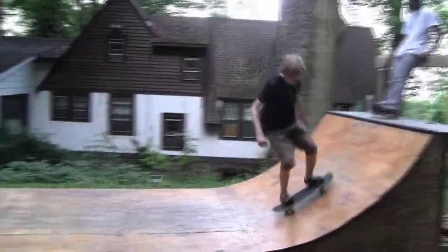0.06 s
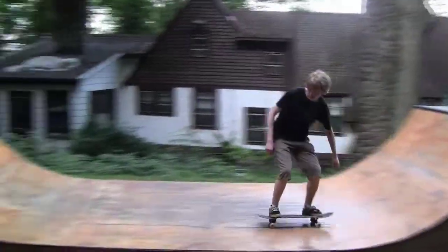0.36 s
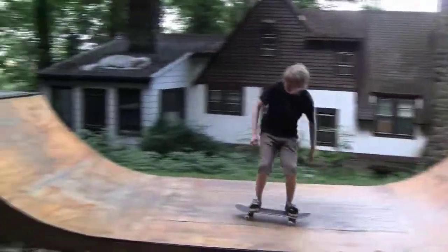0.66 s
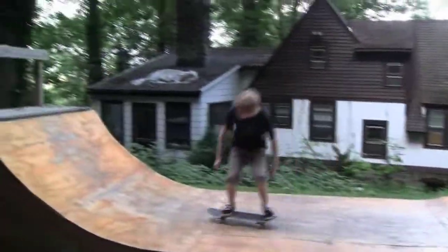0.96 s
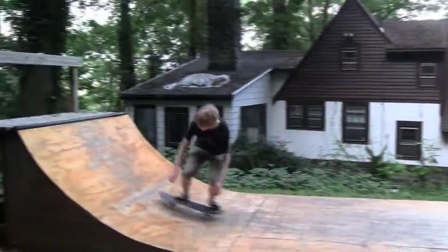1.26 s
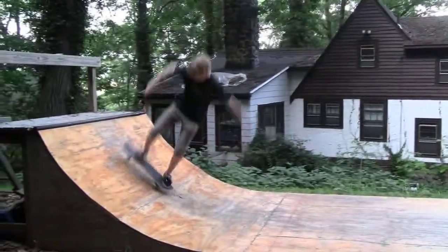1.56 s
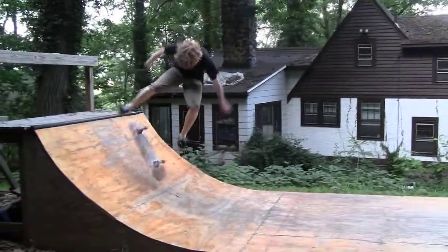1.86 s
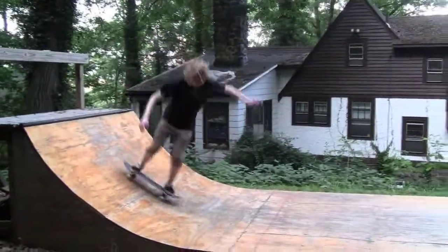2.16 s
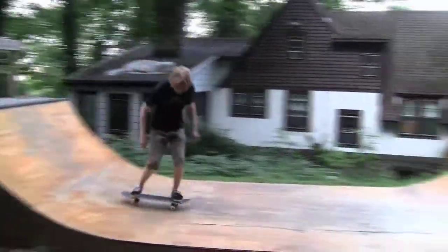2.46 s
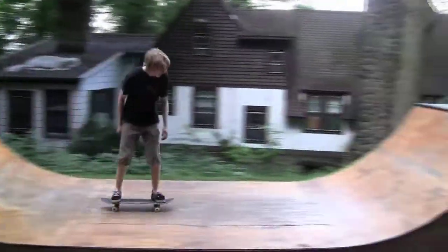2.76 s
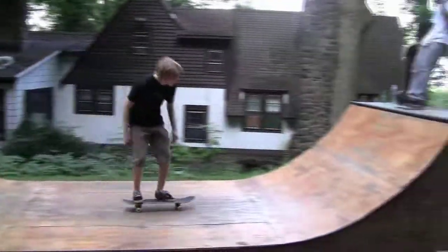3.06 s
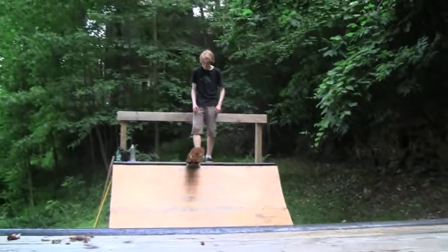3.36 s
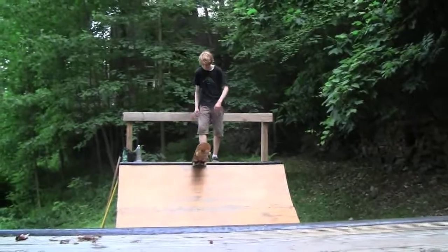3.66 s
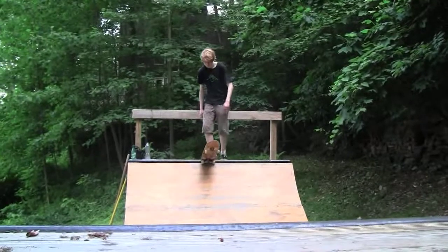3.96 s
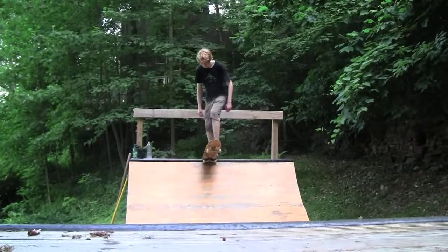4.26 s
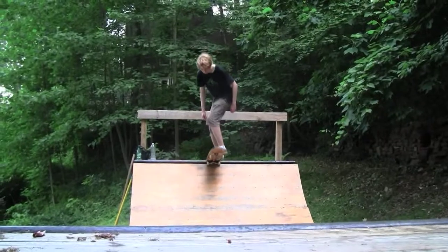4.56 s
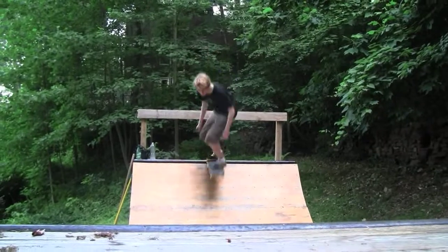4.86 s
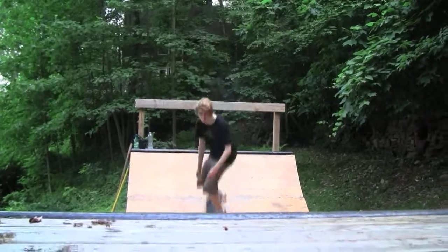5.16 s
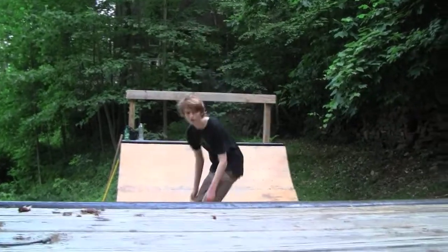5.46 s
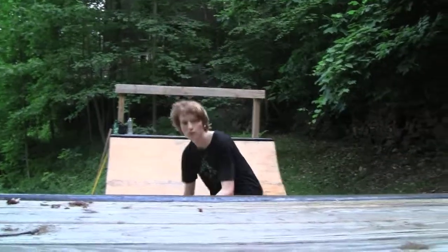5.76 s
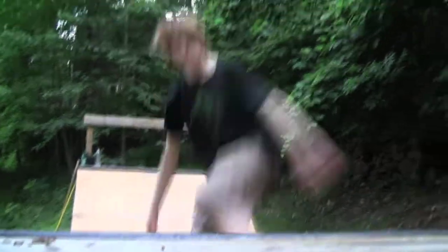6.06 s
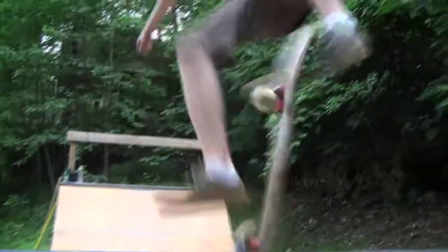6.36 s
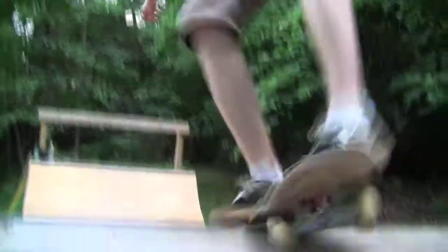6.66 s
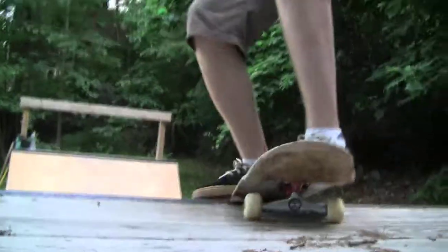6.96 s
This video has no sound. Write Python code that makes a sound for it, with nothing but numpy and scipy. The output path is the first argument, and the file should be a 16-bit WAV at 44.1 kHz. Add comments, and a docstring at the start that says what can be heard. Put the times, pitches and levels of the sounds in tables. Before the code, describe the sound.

Skateboard wheels rumble back and forth on a wooden ramp, broken by sharp clacks and hard landings, the last very close.

```python
"""Skateboarding on a wooden half-pipe

A skater rides a plywood ramp in a wooded yard, heard first from beside it, then from its top deck.
The wheels drum the hollow panels and bump over seams, the bearings hiss, and the board clacks down
after each trick. He sets the tail on the far coping (the steel edge), drops in, rolls up close and
flips the board; the hardest landings overload the microphone."""
import sys
import numpy as np
from scipy import signal
from scipy.fft import rfft, irfft, next_fast_len
from scipy.io import wavfile
from scipy.ndimage import uniform_filter1d, map_coordinates

SR = 44100
rng = np.random.default_rng(int(sys.argv[2]) if len(sys.argv) > 2 else 0)


def persist_wave(psi):
    """Save psi, clipped to +-1, as 16-bit WAV."""
    counts = np.round(np.clip(psi, -1, 1) * 32767).astype(np.int16)
    wavfile.write(sys.argv[1], SR, np.atleast_2d(counts).T)


N = 317520
TIME = np.arange(N) / SR
RING_TIME = np.arange(SR // 2) / SR  # half a second for a blow to die away

# Levels in tables are relative. Sounds have two rows: mid (centre) and side (left-right spread).
# tone colour of sandy rubbing: f/Hz, level/dB
GRIT_COLOUR = [(1350, -20), (2300, -2), (2490, -2), (2790, -7.5), (4190, -2.5), (6190, -9.5), (6660, -8.5),
               (8920, -13.5), (10500, -11), (13000, -21), (14800, -17), (16000, -36)]
# tone colour of a knock on the board: f/Hz, level/dB
WOOD_COLOUR = [(240, -30), (400, -1.5), (532, -7), (694, -0.5), (1090, -8.5), (1250, -19), (1460, -5.5),
               (1590, -11.5), (3600, -24), (4680, -49), (7920, -120)]
# tone colour of a hard, sharp hit: f/Hz, level/dB
CRACK_COLOUR = [(1410, -34.5), (2400, 1.5), (2660, 1), (3270, 0), (5570, -4), (6080, -7), (10600, -18),
                (16000, -25.5)]


def amp(db):
    """Turn decibels into a number to multiply by."""
    return 10 ** (np.asarray(db) / 20)


def unit(x):
    """Scale a sound to an average strength (rms) of 1."""
    return x / np.sqrt(np.mean(x ** 2) + 1e-20)


def along(points, hz):
    """Read between (frequency, value) points, with octaves evenly spaced."""
    freqs, values = np.transpose(points)
    return np.interp(np.log(hz + 1), np.log(freqs + 1), values)


def curves(rows):
    """Turn each column after the time into one value per sample."""
    times, *columns = np.transpose(rows)
    return [np.interp(TIME, times, column) for column in columns]


def during(rows, fade_s=0.036):
    """1 while a table lasts, fading to 0 on either side."""
    return np.clip(1 + np.minimum(TIME - rows[0][0], rows[-1][0] - TIME) / fade_s, 0, 1)


def held(t, length, rise_s, fall_s):
    """A loudness curve that swells up to time t, holds and dies away."""
    return np.exp(np.minimum(TIME - t, 0) / rise_s - np.maximum(TIME - t - length, 0) / fall_s)


def wobble(rate):
    """A smooth curve through `rate` random values a second."""
    return map_coordinates(rng.standard_normal(int(N * rate / SR) + 4), [TIME * rate])


def filtered(x, response):
    """Scale each frequency in x by response(hz)."""
    size = next_fast_len(N + SR // 4)
    return irfft(rfft(x, size) * response(np.fft.rfftfreq(size, 1 / SR)), size)[..., :N]


def body(colour, size=4096):
    """How an object with this tone colour answers one sharp tap."""
    gain = amp(along(colour, np.fft.rfftfreq(size, 1 / SR)))
    cepstrum = irfft(np.log(np.maximum(gain, 1e-6)))
    cepstrum[1:size // 2] *= 2  # folding this forward puts all the ringing after the tap
    cepstrum[size // 2 + 1:] = 0
    return irfft(np.exp(rfft(cepstrum)))[None]


def through(x, response):
    """Play x through an object, given its answer to one tap."""
    return signal.oaconvolve(x, response, axes=1)[:, :x.shape[1]]


def favour(rows, centre_hz, db_per_octave):
    """The spot that is touched brings out the frequencies near centre_hz."""
    return [(hz, db - db_per_octave * abs(np.log2(hz / centre_hz)), *rest) for hz, db, *rest in rows]


def grains(colour, rate, spread_db):
    """Noise made of tiny random taps on an object, about `rate` a second."""
    size = rng.standard_normal((2, N))
    taps = (rng.random((2, N)) < rate / SR) * np.sign(size) * amp(spread_db * np.abs(size))
    return unit(through(taps, body(colour)))


def steady(x):
    """Even out the slow swells of a random vibration."""
    return x / np.sqrt(np.abs(uniform_filter1d(x ** 2, 2600, axis=1)) + 1e-3)


def punch(x):
    """Scale a blow so that its loudest moment has strength 1."""
    return x / np.sqrt(uniform_filter1d(x ** 2, 300, axis=1).max(axis=1, keepdims=True) + 1e-20)


def burst(response, t60):
    """A rattle that shakes an object and fades by 60 dB in t60 seconds."""
    rattle = rng.standard_normal((2, len(RING_TIME))) * amp(-60 * RING_TIME / t60)
    return punch(through(rattle, response))


def ring(tones, detune, attack_s):
    """An object's own fading tones; each struck spot changes their strengths and, a little, pitches."""
    hz, db, t60 = np.transpose(tones)[:, :, None]
    pitch = hz * (1 + detune * rng.standard_normal(hz.shape))
    strength = amp(6 * rng.standard_normal((2, len(tones)))) * rng.choice([-1, 1], (2, len(tones)))
    waves = amp(db - 60 * RING_TIME / t60) * np.sin(2 * np.pi * pitch * RING_TIME)
    return punch(strength @ waves * (1 - np.exp(-RING_TIME / attack_s)))


def add(track, t, sound):
    """Mix a sound into a track at time t."""
    part = track[:, max(round(t * SR), 0):][:, :sound.shape[1]]
    part += sound[:, :part.shape[1]]


def stereo(mid_side, width, side_db):
    """Make left and right from mid and side, with a width that depends on frequency."""
    mid, side = mid_side
    side = filtered(side, lambda hz: amp(along(width, hz) + side_db))
    return np.array([mid + side, mid - side])


def bounced(x, share):
    """Wheel noise also bounces off the curved ramp, by a path that changes as he rides."""
    # how late the bounce arrives: t/s, delay/s
    delays = [(0, 0.0023), (.45, 0.0029), (.9, 0.0029), (1.65, 0.0026), (2.24, 0.0019), (2.7, .0031),
              (3.1, 0.0028), (5.15, 0.0025), (5.7, 0.0033), (6.22, 0.0022)]
    delay, = curves(delays)
    return unit(x + share * np.array([np.interp(TIME - delay, TIME, row) for row in x]))


def dust():
    """Fine grit crackles under the wheels."""
    # tone colour of the crackle: f/Hz, level/dB
    colour = [(4410, -40), (7500, 1), (8510, 2.5), (10200, 5.5), (12700, -3.5), (15200, -1.5), (16000, -57)]
    return grains(colour, rate=8500, spread_db=7)


def rolling(passes, panel, wheel, bearing, drum_db, hollow_db, growl_db, hiss_db, fizz_db):
    """Rough plywood shakes panels, ramp and wheels, more when pressed harder; the bearings rattle."""
    # tone colour of the hollow space inside the ramp: f/Hz, level/dB
    cavity = [(100, -82.5), (350, -14.5), (440, 2), (530, 6.5), (600, 0.5), (700, -10), (850, -11.5),
              (2000, -73.5)]
    load_db, treble_db = curves(np.vstack(passes))  # load is how hard the wheels press
    uneven = wobble(70)  # they press unevenly as they turn
    boom_db = 0.98 * load_db - 1.76 * np.maximum(load_db, 0)  # the braced curves boom less than the flat
    drum = amp(drum_db + load_db + 0.52 * uneven) * steady(grains(panel, rate=1200, spread_db=4))
    hollow = amp(hollow_db + boom_db + 2 * uneven) * steady(grains(cavity, rate=2500, spread_db=3))
    wheel_noise = bounced(grains(wheel, rate=3000, spread_db=1.5), share=0.18)
    growl = amp(growl_db + 1.05 * load_db + uneven) * wheel_noise
    ball_noise = bounced(grains(bearing, rate=9000, spread_db=7.5), share=0.49)
    hiss = amp(hiss_db + treble_db + 0.14 * load_db + 0.63 * uneven) * ball_noise
    fizz = amp(fizz_db + treble_db + 1.2 * uneven) * dust()
    on_ramp = sum(during(rows, fade_s=0.018) for rows in passes)
    return on_ramp * (drum + hollow + growl + hiss + fizz)


def roll_beside_ramp():
    """Two passes heard from beside the ramp; the wheels press most in the curves, least on the flat."""
    # one list per pass: t/s, load/dB, treble/dB
    passes = [
        [(0, 10.5, 6), (0.06, -2.5, 2), (0.24, 4.5, 2), (0.42, 4, 3), (0.54, -3.5, 0.5), (0.72, -3.5, -2.5),
         (0.88, -4, -3), (1.17, 0, -1), (1.44, 6, -1), (1.62, 1, -2.5), (1.69, -14.5, 1), (1.86, -14.5, -8)],
        [(2.24, -8, -6), (2.33, -7, -4), (2.41, 6, 1.5), (2.58, 3, -4.5), (2.72, -3.5, -5), (2.84, -1.5, -6),
         (3.0, -1, -1.5), (3.1, -2, -3)],
    ]
    # tone colours of panels, wheels and bearings: f/Hz, level/dB
    panel = [(18, -47), (30, -43), (64, -25), (107, 1), (140, -6.5), (173, 4.5), (205, 2), (232, 2),
             (344, 3.5), (407, -10.5), (440, -23), (570, -58), (970, -120)]
    wheel = [(380, -14), (650, -1), (840, -2), (1120, 0.5), (1360, -3), (1590, -2.5), (1750, -4),
             (2060, -14.5), (2700, -24.5), (3510, -47), (5940, -120)]
    bearing = [(1290, -34), (2200, -1.5), (2800, -8), (3230, 1.5), (3790, -6.5), (4500, -2), (5830, -9),
               (6620, -7.5), (7260, -15.5), (8200, -13.5), (10700, -24), (18000, -120)]
    return rolling(passes, panel, wheel, bearing,
                   drum_db=-23, hollow_db=-28, growl_db=-30.5, hiss_db=-41, fizz_db=-51)


def outdoor_air(move_s=3.12):
    """Air and leaves rustle softly; the sound changes when the listener moves to the deck."""
    # tone colours beside the ramp and on the deck: f/Hz, level/dB
    beside_colour = [(24, -42), (60, -6), (125, -1.5), (300, -5.5), (500, -8), (1130, -5), (1820, -12.5),
                     (5000, -24.5), (15500, -32.5)]
    deck_colour = [(18, -99), (30, -32), (100, -7.5), (227, -7), (287, -0.5), (345, -7), (512, -10.5),
                   (584, -6.5), (666, -11), (1460, -23.5), (1860, -25.5), (14800, -48), (16000, -43)]
    beside = amp(-42) * grains(beside_colour, rate=20000, spread_db=4.5)
    on_deck = amp(-43.5) * grains(deck_colour, rate=20000, spread_db=3.5)
    return np.where(TIME < move_s, beside, on_deck)


def yard_echo(x):
    """Trees and house scatter the sound back, each frequency dying at its own speed."""
    # how long the echo lasts: f/Hz, time to fade by 60 dB/s
    fade_times = [(100, 1), (500, 0.72), (2000, 0.65), (5000, 1), (12000, 0.36)]
    hz, t, noise = signal.stft(rng.standard_normal((2, SR)), SR, nperseg=256)
    fade = amp(-60 * t / along(fade_times, hz)[:, None])
    onset = 1 - np.exp(-t / 0.0018)
    _, tail = signal.istft(noise * fade * onset, SR, nperseg=256)
    return through(x, tail / np.linalg.norm(tail[0]))


def skids():
    """The wheels slide sideways over the plywood with a short, bright hiss."""
    # each slide: t/s, length/s, level/dB
    slides = [(0.33, 0.094, -41.5), (0.757, 0.05, -47.5), (1.755, 0.062, -45), (2.805, 0.039, -44.5),
              (3.067, 0.029, -43.5)]
    sliding = sum(amp(db) * held(t, length, rise_s=0.023, fall_s=0.02) for t, length, db in slides)
    sandy = grains(GRIT_COLOUR, rate=3500, spread_db=4)
    return sliding * (dust() + amp(2.5) * sandy)


def panel_boom(panel_hz):
    """A struck plywood panel booms at a pitch set by its span."""
    # its tones: multiple of the panel pitch, level/dB, time to fade by 60 dB/s
    tones = [(0.699, -9.5, .11), (0.878, -8, 0.083), (0.999, 0.5, 0.099), (1.17, -9, 0.094),
             (1.5, -15.5, 0.052)]
    return ring([(ratio * panel_hz, db, t60) for ratio, db, t60 in tones], detune=0.015, attack_s=0.0053)


def seam_bumps(wheelbase_m=0.36, rear_db=5, rear_pitch=0.77):
    """The front wheels thump over each seam; the rear ones follow, heavier and lower."""
    # each crossing: t/s, speed/(m/s), level/dB, panel pitch/Hz
    seams = [(0.331, 3.25, -7, 349.6), (1.155, 3.7, -7.5, 346), (1.21, 4.2, -10, 297),
             (1.351, 4.6, -9.5, 280), (1.494, 3.75, -8.5, 284.5), (2.483, 3.56, -9, 260),
             (5.394, 5.2, -2, 287), (5.444, 4, -4.5, 357), (5.848, 4.7, -3.5, 385)]
    track, wood = np.zeros((2, N)), body(WOOD_COLOUR)
    for t, speed, db, panel_hz in seams:
        for lag, weight_db, pitch in (0, 0, 1), (wheelbase_m / speed, rear_db, rear_pitch):
            thump = panel_boom(pitch * panel_hz) + amp(-17) * burst(wood, t60=0.033)
            add(track, t + lag, amp(db + weight_db - 7.5) * thump)
    return track


def grit_ticks():
    """Bits of grit snap under the wheels."""
    # each snap: t/s, level/dB
    snaps = [(0.394, -29), (1.121, -15), (1.494, -22), (2.62, -20), (2.837, -25), (3.086, -21),
             (5.383, -22), (5.46, -18), (5.841, -18), (5.927, -14.5), (6.046, -30)]
    track, hard = np.zeros((2, N)), body(CRACK_COLOUR)
    for t, db in snaps:
        add(track, t, amp(db - 14.5) * burst(hard, t60=0.023))
    return track


def clacks():
    """Blows ring the maple board and the panel below; gives the direct sound and the part that echoes."""
    # each blow: t/s, clack/dB, board's favoured pitch/Hz, thud/dB, crack/dB
    blows = [(0.806, -15.5, 760, -27, -26.5), (1.641, -22, 678, -34, -18), (1.741, -8, 1080, -21.5, -22.5),
             (1.815, -15.5, 686, -32, -26), (2.173, 3, 850, -3.5, -10.5), (2.197, 1.5, 900, -10, -6),
             (2.202, 4.5, 1060, -6, -8.5), (2.215, -15, 1130, -10, -14.5), (2.279, -6, 616, -31, -23.5),
             (3.17, -4.5, 1370, -29, -23), (3.283, -15, 1820, -33, -30), (3.347, 2, 2200, -19.5, -15.5),
             (3.364, -4, 696, -24, -19), (3.379, -17, 630, -16, -19.5), (3.563, -12, 855, -25, -31),
             (3.823, -32.5, 710, -48, -60), (4.396, -21, 760, -50, -32), (4.409, -16.5, 786, -37, -24),
             (4.674, -24, 630, -44, -54), (4.686, -40, 643, -49, -37), (4.995, -26, 820, -34, -45),
             (5.098, -19, 663, -23, -36), (5.121, 7.5, 620, -1.5, -6.5), (5.178, -23, 600, -10, -36),
             (5.255, -0.5, 616, -14, -28), (5.381, -5, 583, -5.5, -24.5), (5.847, -4, 557, -15, -42),
             (6.321, -18, 600, -6.5, -42), (6.357, -0.5, 770, -22, -16.5), (6.405, 2.5, 1510, -7.5, -34),
             (6.685, 13, 1380, 2.5, 0), (6.697, 4, 560, -4, -27), (6.717, -10, 573, -24, -20),
             (6.783, 3.5, 895, -3.5, -9), (6.798, -2, 580, -12, -17.5), (6.826, 4, 724, -19, -21),
             (6.927, -21.5, 826, -21.5, -37), (7.062, -11, 1920, -13.5, -27)]
    # where the board is: from t/s, panel pitch/Hz, echo/dB, stereo width/dB
    places = [(0, 265, -15, 2), (3.12, 239.6, -13, -1), (5.11, 268.5, -18, -3), (6.25, 329, -37, -9),
              (6.6, 398, -33.5, 1)]
    # the board's own tones: f/Hz, level/dB, time to fade by 60 dB/s
    board_tones = [(536.5, -12, 0.16), (637, 8, 0.053), (836, -14.5, 0.15), (960, -5, 0.18),
                   (1228, 9, 0.095), (1264, 4, 0.061), (1551, 13.5, 0.029), (1862, 17.5, 0.015),
                   (2170, 9, 0.029)]
    # tone colour of the ramp's thud: f/Hz, level/dB
    thud_colour = [(15, -55), (25, -5), (54, -15.5), (293, 6.5), (377, 0), (512, -2), (600, 2.5),
                   (780, -50), (1320, -120)]
    direct, to_yard = np.zeros((2, 2, N))
    hard, hollow = body(CRACK_COLOUR), body(thud_colour)
    for t, clack_db, board_hz, thud_db, crack_db in blows:
        _, panel_hz, echo_db, width_db = [place for place in places if place[0] <= t][-1]
        knock = burst(body(favour(WOOD_COLOUR, board_hz, db_per_octave=8.5)), t60=0.089)
        note = ring(favour(board_tones, board_hz, db_per_octave=8.5), detune=0.012, attack_s=0.0001)
        clack = amp(clack_db) * (amp(-13) * knock + amp(-12.5) * note)
        crack = amp(crack_db - 6) * burst(hard, t60=0.05)
        thud = amp(thud_db) * (amp(-10) * burst(hollow, t60=0.18) + amp(-1.5) * panel_boom(panel_hz))
        add(direct, t, amp([[0], [width_db]]) * (clack + crack) + thud)
        add(to_yard, t, amp(echo_db) * (clack + crack + thud))
    return direct, to_yard


def roll_from_deck():
    """Heard from the deck, the wheels climb the far wall, then drop in and come close."""
    # one list per pass: t/s, load/dB, treble/dB
    passes = [
        [(3.13, -12.5, -16), (3.25, -18, -6), (3.41, -8.5, -6), (3.55, -42, -10), (3.66, -31, -17)],
        [(5.14, -3, -0.5), (5.3, 4.5, 1.5), (5.46, -1.5, -2), (5.62, -0.5, -1.5), (5.78, 0.5, -1),
         (5.98, 3.5, 1), (6.07, 0.5, -2), (6.21, 2.5, 0.5), (6.3, -5.5, -6), (6.46, -22, -9)],
    ]
    # tone colours of panels, wheels and bearings: f/Hz, level/dB
    panel = [(18, -37), (30, -26), (54, -34), (82, -10), (134, -13.5), (183, -5.5), (243, -2.5), (363, 1),
             (402, -10.5), (440, -9), (570, -49), (970, -120)]
    wheel = [(380, -20.5), (650, 3), (754, -1.5), (935, 1), (1020, -2.5), (1100, -3), (1570, -4.5),
             (2700, -20), (3510, -54), (5940, -120)]
    bearing = [(1350, -20), (2300, -16), (2760, -2.5), (3080, 3.5), (3770, -0.5), (4330, 3), (8200, -12.5),
               (10700, -42), (18000, -120)]
    # the panels boom more as he nears the deck: t/s, level/dB
    nearing = [(5.15, -6), (5.45, 0.5), (6.0, 5), (6.2, 2), (6.5, -12)]
    near_db, = curves(nearing)
    return rolling(passes, panel, wheel, bearing,
                   drum_db=near_db - 14.5, hollow_db=near_db - 22.5, growl_db=-26, hiss_db=-38, fizz_db=-55)


def coping_rings():
    """The board's metal axle mount hits the ramp's steel edge and rings."""
    # each hit: t/s, level/dB
    hits = [(3.347, -25), (3.563, -43), (5.122, -40)]
    # the steel's tones: f/Hz, level/dB, time to fade by 60 dB/s
    steel_tones = [(1882, -7.5, 0.11), (2130, -7, 0.11), (2180, 1, 0.05), (3600, 1, 0.089), (4720, 0, .16),
                   (4210, 9, 0.27), (4970, 1, 0.21), (5040, -11, .22), (5600, -29, .1), (6550, -20, .18)]
    track = np.zeros((2, N))
    for t, db in hits:
        add(track, t, amp(db) * ring(steel_tones, detune=0.0056, attack_s=0.00024))
    return track


def free_wheels():
    """Lifted wheels whirr freely and run down; the last whirr grows a little instead."""
    # each spin: t/s, level/dB, fall/(dB/s)
    spins = [(3.38, -39.5, 66), (4.24, -51, 23), (4.43, -47.5, 46.5), (4.96, -51, -8)]
    # tone colour of the whirr: f/Hz, level/dB
    colour = [(1470, 5), (2500, -6.5), (3560, -6), (3860, -8), (5100, -3.5), (6830, -7), (7410, -17),
              (11300, -19), (15000, -38)]
    spinning = sum(amp(db - fall * np.maximum(TIME - t, 0)) * held(t, 0.46, rise_s=0.061, fall_s=0.1)
                   for t, db, fall in spins)
    return spinning * grains(colour, rate=7400, spread_db=9)


def far_drone():
    """A faint, wavering tone comes and goes far away."""
    # its slow glide: t/s, f/Hz
    glide = [(3.75, 277), (4.1, 292), (4.3, 300.3), (4.62, 306.7), (4.8, 288), (5.05, 246)]
    # each swell: t/s, length/s, level/dB
    swells = [(3.774, 0.095, -39.5), (4.006, 0.17, -38.5), (4.264, 0.038, -35), (4.38, 0.11, -37.5),
              (4.57, 0.038, -37), (4.792, 0.39, -41.5)]
    hz, = curves(glide)
    loudness = sum(amp(db) * held(t, length, rise_s=0.018, fall_s=0.018) for t, length, db in swells)
    return loudness * np.sin(2 * np.pi * np.cumsum(hz + 3 * wobble(34)) / SR)


def whistle():
    """A thin, high whistle of two tones at once, perhaps a bird."""
    # the lower tone: t/s, f/Hz, level/dB
    call = [(3.93, 5690, -65), (4.14, 5610, -65)]
    hz, db = curves(call)
    phase = 2 * np.pi * np.cumsum(hz + 80 * wobble(300)) / SR
    return amp(db) * during(call) * (np.sin(phase) + amp(-6) * np.sin(1.175 * phase))


def squeaks():
    """Rubbery soles and wheels stick and slip, making short, unsteady tones."""
    # each slip: t/s, length/s, f/Hz, level/dB
    slips = [(5.027, 0.043, 1860, -39), (6.655, 0.018, 1550, -8), (6.658, 0.014, 1860, -11)]
    track = np.zeros((2, N))
    for t, length, hz, db in slips:
        swell = np.hanning(int(length * SR)) ** 0.5
        pitch = hz * (1 + 0.072 * wobble(500)[:len(swell)])
        squeak = amp(db) * swell * np.sin(2 * np.pi * np.cumsum(pitch) / SR)
        add(track[:1], t, squeak[None])
    return track


def shoe_scrapes():
    """Soles drag over the grip tape or the deck in surges; the board rasps and the deck hums below."""
    # each drag: t/s, length/s, hum/dB, rasp/dB, grit/dB, grit's favoured pitch/Hz
    drags = [(6.26, 0.054, -20, -24.5, -25.5, 3500), (6.354, 0.043, -24.5, -24, -27, 6000),
             (6.441, 0.07, -36, -44, -27.5, 7800), (6.559, 0.056, -34, -21, -31, 3020),
             (6.654, 0.013, -36, -22, -24.5, 4000), (6.767, 0.01, -26, -29, -36.5, 3970),
             (6.88, 0.32, -37, -42, -51, 2480)]
    # tone colours of the hum and the rasp: f/Hz, level/dB
    hum_colour = [(18, -64), (30, -41), (136, -28), (242, -9.5), (393, -3), (474, -10), (514, -9),
                  (558, -28), (621, -18), (750, -9), (980, -46), (1650, -120)]
    rasp_colour = [(290, -33), (500, -17), (680, -7), (884, -3), (1160, -2.5), (1410, -6), (1610, -5),
                   (3000, -21.5), (3900, -59), (6600, -120)]
    press, rub, grit = np.zeros((3, 2, N))
    for t, length, hum_db, rasp_db, grit_db, grit_hz in drags:
        stroke = held(t, length, rise_s=0.026, fall_s=0.04)
        press += amp(hum_db) * stroke
        rub += amp(rasp_db) * stroke
        sandy = grains(favour(GRIT_COLOUR, grit_hz, db_per_octave=3), rate=3800, spread_db=2)
        grit += amp(grit_db) * stroke * sandy
    grip = wobble(98)  # the sole catches and slips
    hum = press * steady(grains(hum_colour, rate=1500, spread_db=2))
    rasp = rub * amp(0.85 * grip) * grains(rasp_colour, rate=3500, spread_db=4.5)
    return hum + rasp + amp(1.7 * grip) * grit


def scene():
    """The board sounds nearly centred; air and echoes come from all around."""
    # stereo width of near sounds, and of air and echoes: f/Hz, side level/dB
    narrow = [(60, -37), (200, -32.5), (400, -15), (700, -13.5), (1300, -34), (2400, -42), (4400, -12),
              (8000, 0), (15000, 1.5)]
    wide = [(60, -23), (250, -10), (700, -7), (3000, -8), (6000, -5), (10000, 2.5)]
    first_run = roll_beside_ramp()
    deck_run = roll_from_deck()
    ride = first_run + seam_bumps() + grit_ticks() + skids()
    blows, to_yard = clacks()
    close = blows + coping_rings() + shoe_scrapes() + squeaks()
    around = yard_echo(to_yard + amp(-20.5) * (ride + deck_run)) + outdoor_air() + free_wheels()
    around[0] += far_drone() + whistle()  # centre only
    wheels = stereo(ride, narrow, side_db=-3) + stereo(deck_run, narrow, side_db=-5)
    return wheels + stereo(close, narrow, side_db=-4.5) + stereo(around, wide, side_db=-1)


def record(dry, low_cut_hz=20, top_hz=15900):
    """The microphone thins the deep bass, squashes the loudest blows and loses the highest treble."""
    thinned = filtered(dry, lambda hz: 1j * hz / (1j * hz + low_cut_hz))
    clipped = thinned / (1 + np.abs(thinned) ** 8) ** (1 / 8)
    return filtered(clipped, lambda hz: hz < top_hz)


dry = scene()
out = record(dry)
persist_wave(out)
```